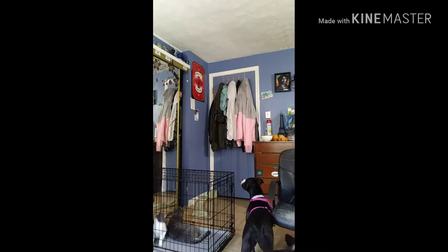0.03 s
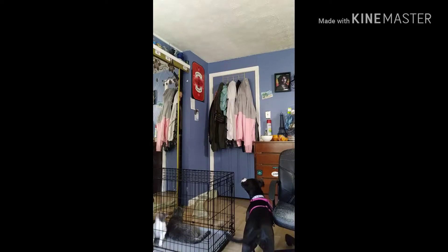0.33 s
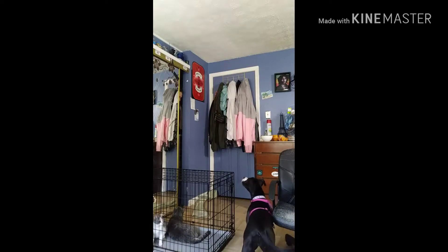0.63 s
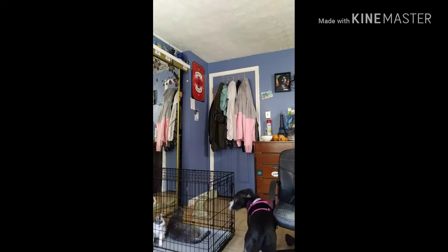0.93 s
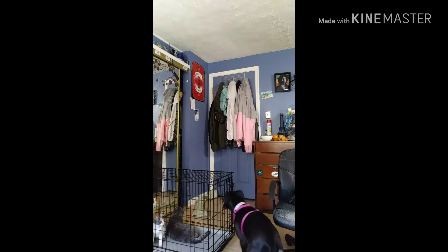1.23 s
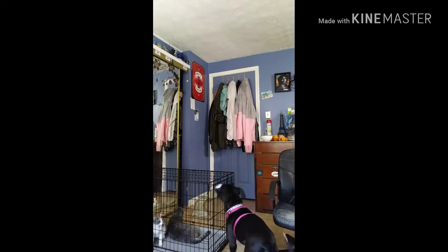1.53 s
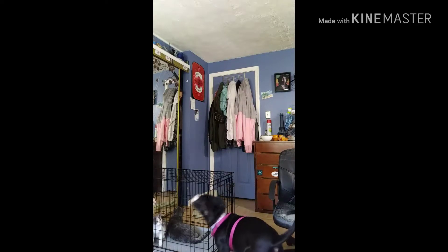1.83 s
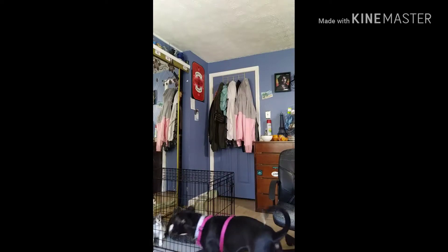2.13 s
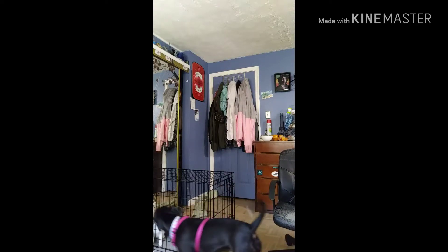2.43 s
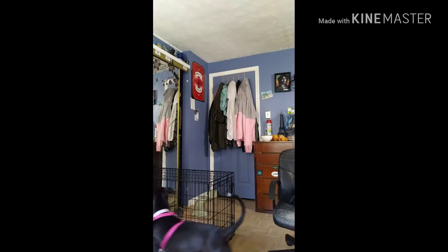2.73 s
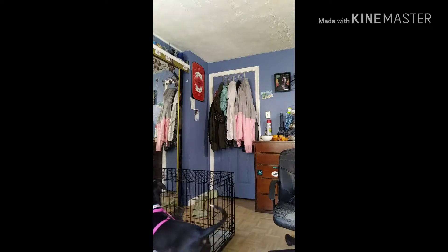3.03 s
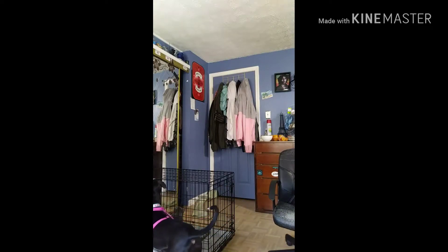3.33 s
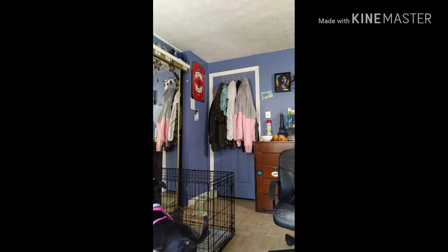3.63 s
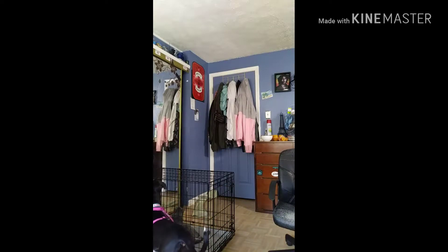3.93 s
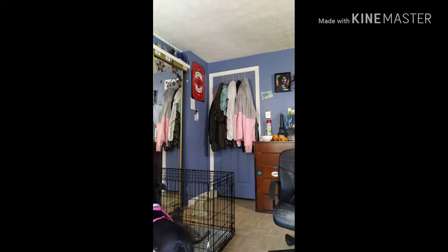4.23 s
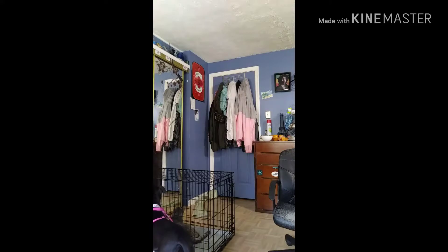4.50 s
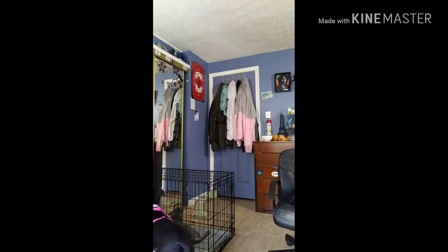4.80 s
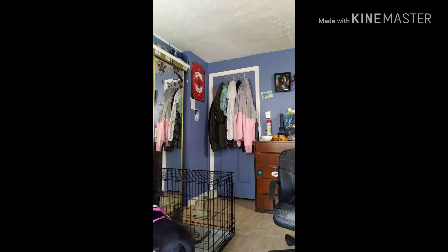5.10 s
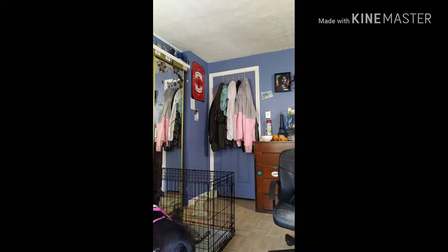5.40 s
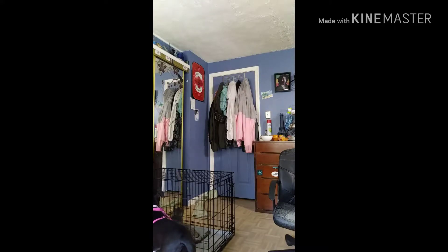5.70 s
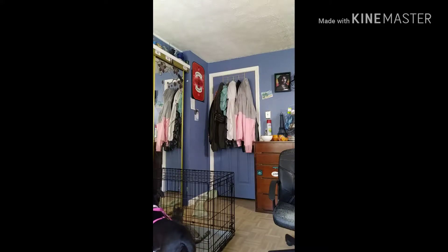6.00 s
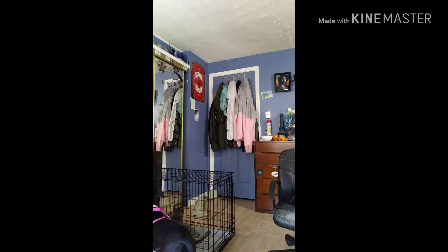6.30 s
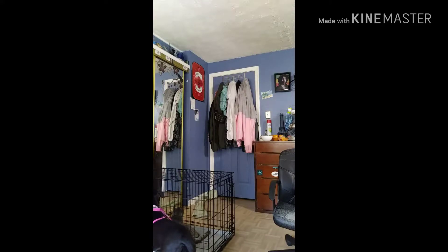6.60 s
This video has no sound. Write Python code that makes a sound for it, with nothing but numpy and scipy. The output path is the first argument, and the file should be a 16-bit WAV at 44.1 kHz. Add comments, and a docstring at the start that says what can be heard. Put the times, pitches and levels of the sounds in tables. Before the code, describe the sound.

Right at the start, a single short, raspy dog bark hits the microphone hard, with the brief echo of a small bedroom. About a second in come two bright snaps, then a quick swish as the dog slides past a wire crate. The rest is quiet: scattered clinks of harness and wire, a few soft paw steps on carpet, faint whistling whines and a low fan hum.

```python
"""A dog gives one loud, rough bark in a small bedroom, close enough to overload the microphone.
Its vocal folds break from a low grunt into a rasp, shaped by the throat, with hiss from the open jaws.
Two sharp snaps follow; the dog pads off over carpet, brushing along its wire crate, its harness ticking.
It whines in thin, faint whistles throughout, and a fan hums in the background."""
import sys
import numpy as np
from scipy import signal
from scipy.fft import rfft, irfft, next_fast_len
from scipy.io import wavfile
from scipy.ndimage import map_coordinates

SR = 44100
rng = np.random.default_rng(int(sys.argv[2]) if len(sys.argv) > 2 else 0)


def wav_out(sig):
    """Save sig, one row per channel (or a flat mono array), as 16-bit PCM at SR to the path in sys.argv[1]."""
    wavfile.write(sys.argv[1], SR, np.round(np.clip(np.atleast_2d(sig).T, -1, 1) * 32767).astype(np.int16))


N = 297675
TIME = np.arange(N) / SR


def amp(db):
    """Decibels to gain."""
    return 10 ** (np.asarray(db) / 20)


def unit(x):
    """Scale to rms 1."""
    return x / np.sqrt(np.mean(x ** 2) + 1e-20)


def along(points, hz):
    """Read a curve of (Hz, value) points on a log frequency axis."""
    freqs, values = np.transpose(points)
    return np.interp(np.log(hz + 1), np.log(freqs + 1), values)


def arch(start, length, crest, steep):
    """A smooth swell from 0 to 1 and back, peaking at the fraction crest of its length."""
    ramp = np.interp(TIME, start + length * np.array([0, crest, 1]), [0, 1, 0])
    return np.sin(np.pi / 2 * ramp) ** steep


def noise(samples=N):
    """White noise."""
    return rng.standard_normal(samples)


def wobble(rate):
    """A smooth random curve, rate knots a second."""
    return map_coordinates(noise(int(N * rate / SR) + 4), [TIME * rate])


def sine(hz):
    """A sine oscillator that follows a pitch curve."""
    return np.sin(2 * np.pi * np.cumsum(hz) / SR)


def filtered(x, response):
    """x through a complex frequency response."""
    size = next_fast_len(N + SR // 2)
    return irfft(rfft(x, size) * response(np.fft.rfftfreq(size, 1 / SR)), size)[:N]


def coloured(x, eq, size=4096):
    """x through a minimum-phase EQ of unit energy: only the curve's shape counts."""
    cepstrum = irfft(np.log(amp(along(eq, np.fft.rfftfreq(size, 1 / SR)))))
    cepstrum[1:size // 2] *= 2
    cepstrum[size // 2 + 1:] = 0
    kernel = irfft(np.exp(rfft(cepstrum)))
    return signal.fftconvolve(x, kernel / np.linalg.norm(kernel))[:N]


# The bedroom's short reverb. Each row: frequency in Hz, seconds to fall 60 dB.
ROOM_DECAY = [(150, 0.27), (500, .3), (2000, 0.24), (5000, 0.28), (12000, 0.23)]

def room(x, build_s):
    """The bedroom's diffuse tail builds up, then each frequency dies at its own speed."""
    hz, t, spectrum = signal.stft(noise(SR // 2), SR, nperseg=256)
    decay = amp(-60 * t / along(ROOM_DECAY, hz)[:, None])
    tail = signal.istft(spectrum * decay, SR, nperseg=256)[1]
    tail *= 1 - np.exp(-(np.arange(len(tail)) / SR / build_s) ** 2)
    return signal.fftconvolve(x, tail / np.linalg.norm(tail))[:N]


# The fan's hum. Each row: pitch in Hz, level in dB.
FAN_TONES = [(140.0, -70.5), (279.9, -64.5), (1007, -74.5)]
# Its dark rush of air. Each row: frequency in Hz, relative level in dB.
AIR_EQ = [(18, -43.5), (30, -22), (50, -7), (90, -11), (140, -5), (190, -14), (275, -3.5), (340, -12.5),
          (900, -20), (1200, -25.5), (3000, -31.5), (5300, -31.5), (7500, -43), (15400, -46.5)]

def fan(air_db=-61, drift_hz=1.2, waver_db=2):
    """A soft bed of moving air under slightly unsteady motor and blade tones."""
    hum = np.zeros(N)
    for hz, db in FAN_TONES:
        hum += amp(db + waver_db * wobble(6)) * unit(sine(hz + drift_hz * wobble(6.6)))
    return hum + amp(air_db) * unit(coloured(noise(), AIR_EQ))


def fidget(level_db=-64, spread_db=3, decay_s=.0054, count=45):
    """Faint scattered pings of harness and wire as the dog moves about."""
    pings = np.zeros(N + SR)
    t = np.arange(SR // 20) / SR
    for when, height, strength in rng.random((count, 3)):
        start = np.interp(when, [0, .75, 1], [.5, 4.3, 6.6])  # busier while it walks
        hz = 1300 * 2 ** (2.7 * height)
        ping = np.sin(2 * np.pi * hz * t) * np.exp(-t / decay_s) * (1 - np.exp(-t / .001))
        pings[round(start * SR):][:len(t)] += amp(level_db + spread_db * (2 * strength - .5)) * ping
    return pings[:N] + room(pings[:N], build_s=.004)


# Paws on carpet. Each row: start in seconds, relative peak level in dB.
PAW_STEPS = [(1.279, -50.5), (3.879, -47), (4.928, -52)]

def footfalls(attack_s=.023, gain_db=-8):
    """Soft steps thump the floor through the carpet."""
    envelope = np.zeros(N)
    for start, db in PAW_STEPS:
        age = np.maximum(TIME - start, 0) / attack_s
        envelope += amp(db) * age * np.exp(1 - age)
    thump_eq = [(25, -12.5), (50, 5), (130, -.5), (300, -23.5), (1000, -77.5)]  # Hz, dB
    return amp(gain_db) * envelope * unit(coloured(noise(), thump_eq))


# The whines. Each row: start in seconds, length in seconds, relative peak in dB, glide in Hz a second.
WHINE_SWELLS = [(.46, .27, -56.5, -700), (1.668, .3, -56, -200), (2.869, 0.31, -60.5, 304),
                (4.07, .36, -57, -150), (5.3, 0.36, -58.5, 0), (6.46, .4, -64.5, -2)]

def whines(centre_hz=5476, flutter=.0116, tremble_db=4, upper_ratio=1.28, direct_db=-6, room_db=-4):
    """Thin nasal whistles swell slowly and fade faster, with a weaker, shakier whistle above."""
    def whistle(hz, waver):
        return unit(sine(hz * (1 + waver * wobble(30) + flutter * wobble(300))))

    envelope, pitch = np.zeros(N), np.full(N, float(centre_hz))
    for start, length, db, glide in WHINE_SWELLS:
        swell = arch(start, length, crest=.7, steep=1.4)
        envelope += amp(db) * swell
        pitch += (swell > 0) * glide * (TIME - start - length / 2)
    envelope *= amp(tremble_db * wobble(35))
    lower = whistle(pitch, waver=.006)
    upper = amp(-20) * whistle(upper_ratio * pitch, waver=.025)
    sound = envelope * (lower + upper)
    return amp(direct_db) * sound + amp(room_db) * room(sound, build_s=.002)


# The bright, peaky swish along the crate. Each row: frequency in Hz, relative level in dB.
BRUSH_EQ = [(240, -53), (400, -31), (540, -9), (630, -3), (885, -43), (1440, -48), (1730, -2.5),
            (1930, -22.5), (2180, -4.5), (2350, -12.5), (2540, -9.5), (3780, -5.5), (5500, .5), (8500, -8),
            (11000, -19), (15400, -30)]

def brush(start_s=1.9497, length_s=.1675, gain_db=-31.5, grain_db=3, direct_db=-4, room_db=-2):
    """Coat and harness slide along the crate in one fine-grained stroke."""
    stroke = amp(gain_db) * arch(start_s, length_s, crest=.4, steep=1.4)
    friction = noise() * amp(grain_db * wobble(500))
    swish = stroke * unit(coloured(friction, BRUSH_EQ))
    return amp(direct_db) * swish + amp(room_db) * room(swish, build_s=.0028)


# Harness, claw and crate-wire ticks. Each row: start in seconds, relative level in dB,
# band centre in Hz, band width in octaves, decay in seconds.
CONTACTS = [(.797, -55, 5400, .09, .008), (1.122, -55.5, 8347, .3, .009), (1.244, -45.5, 8000, .28, 0.017),
            (1.264, -48.5, 5800, .5, .008), (1.682, -39.5, 3980, 0.45, 0.021),
            (1.83, -45.5, 5960, .24, .014), (1.942, -42.5, 6600, .12, 0.013), (2.346, -54, 5050, .07, .002),
            (2.74, -59, 3785, 0.68, 0.025), (3.371, -51, 5500, .25, .005), (3.382, -36, 5150, 0.27, .0016),
            (3.394, -55, 2490, .04, .005), (3.475, -57, 6430, 0.14, .001), (3.91, -49.5, 5600, 0.28, .005),
            (3.959, -51.5, 5400, 0.31, .005), (5.406, -47, 5500, .27, .008), (5.413, -50, 3750, .08, .005)]
# The ring of the small hardware. Each row: mode frequency in Hz, relative level in dB.
HARDWARE_MODES = [(1300, 14), (2490, 6.5), (3530, 2.5), (3980, -2), (4511, 2.5), (4764, -1.5), (5060, -3),
                  (5378, -2.5), (5900, -1), (6600, 1), (7200, -2.5), (9200, 1)]
# The tone shared by all ticks. Each row: frequency in Hz, relative level in dB.
TICK_EQ = [(1000, 1.5), (2500, 1.5), (3000, -4), (3600, 0), (4200, -3), (4600, 1), (5500, 3.5), (6250, -4),
           (7200, 1), (8000, -4.5), (9800, -8), (11500, -19), (15000, -26)]

def ticks(ring_s=.0067, ring_db=3, attack_share=.39, direct_db=17, room_db=17):
    """Each contact is a short scuff in its own band that sets the hardware's nearby modes ringing."""
    def band(hz, centre, octaves):
        return np.exp(-(np.log2((hz + 1) / centre) / (2 * octaves)) ** 2)

    taps = np.zeros(N + SR)
    t = np.arange(SR // 5) / SR
    freqs = np.fft.rfftfreq(len(t), 1 / SR)
    mode_hz, mode_db = np.transpose(HARDWARE_MODES)
    for start, db, centre, octaves, decay_s in CONTACTS:
        scuff = irfft(band(freqs, centre, octaves) * rfft(noise(len(t)))) * np.exp(-t / decay_s)
        strengths = band(mode_hz, centre, octaves) * amp(mode_db + rng.normal(0, 2.1, len(mode_hz)))
        strengths *= rng.choice([-1, 1], len(mode_hz))
        clink = strengths @ np.sin(2 * np.pi * np.outer(mode_hz, t)) * np.exp(-t / ring_s)
        attack = 1 - np.exp(-t / (attack_share * decay_s))
        tick = attack * (unit(scuff) + amp(ring_db) * unit(clink))
        taps[round(start * SR):][:len(t)] += amp(db) * tick / np.linalg.norm(tick)
    sound = coloured(taps[:N], TICK_EQ)
    return amp(direct_db) * sound + amp(room_db) * room(sound, build_s=.0034)


# The two snaps. Each row: start in seconds, relative level in dB.
SNAP_HITS = [(0.9571, -25), (1.3103, -16.5)]
# A shielded direct path, then strong slaps off walls and ceiling. Each row: delay in seconds, gain in dB.
SNAP_PATHS = [(0, -1), (.0098, 4.5), (0.0134, 6), (0.0226, 5.5)]
# The snaps' hard, bright edge. Each row: frequency in Hz, relative level in dB.
SNAP_EQ = [(410, -50), (700, -31), (774, -50), (866, -40), (1220, -38), (1420, -11.5), (1750, -14.5),
           (2200, -6), (3530, -6), (4050, .5), (4360, -2.5), (4820, .5), (5400, -3), (5900, -10),
           (6600, -10), (7200, -15), (10400, -33), (14000, -64.5)]

def snaps(decay_s=.0042, direct_db=10, room_db=8):
    """Each snap is a sharp crack that arrives along several paths, a burst of noise for each."""
    cracks = np.zeros(N)
    t = np.arange(SR // 50) / SR
    for start, db in SNAP_HITS:
        for delay, path_db in SNAP_PATHS:
            crack = np.exp(-t / decay_s) * noise(len(t))
            crack /= np.linalg.norm(crack)
            cracks[round((start + delay) * SR):][:len(t)] += amp(db + path_db) * crack
    sound = coloured(cracks, SNAP_EQ)
    return amp(direct_db) * sound + amp(room_db) * room(sound, build_s=.0024)


# Narrow resonances under the bark. Each row: frequency in Hz, bandwidth in Hz, gain in dB.
WIRE_MODES = [(1375, 22, -4), (1460, 22, -5), (1750, 20, 2), (1980, 24, -3), (2620, 60, -3), (4472, 32, 8),
              (6310, 40, 5)]

def wire_ring(x):
    """A sympathetic ring, likely from the crate's wires."""
    return filtered(x, lambda hz: sum(
        amp(db) * 1j * hz * width / (centre ** 2 - hz ** 2 + 1j * hz * width)
        for centre, width, db in WIRE_MODES))


def clean_folds(pitch, octave_db):
    """Cleanly vibrating vocal folds: a slightly unsteady fundamental and its octave."""
    hz = pitch * (1 + .012 * wobble(200))
    return unit(sine(hz) + amp(octave_db) * sine(2 * hz))


# The body of the bark, shaped by throat and jaws. Each row: frequency in Hz, relative level in dB.
THROAT_EQ = [(20, -50), (55, -24), (130, -17), (230, -13), (340, -10), (410, -4), (470, -3.5), (560, -3),
             (610, -9), (700, -1), (800, 0.5), (950, -3), (1080, -4.5), (1400, -0.5), (1900, -4.5),
             (2150, -13.5), (2620, -9), (2950, -26), (14000, -68)]
# The mouth's hiss on top. Each row: frequency in Hz, relative level in dB.
MOUTH_EQ = [(2500, -29), (3100, -12.5), (3700, 3), (4100, -5), (4600, -3), (5300, -2.5), (6050, -9),
            (6800, -5.5), (8800, -15), (11000, -25), (15000, -32)]

def rough_folds(pitch, jaws_open, jitter=.11, breath_share=.8, rasp_db=-7.5, hiss_db=-14, shut_db=-11):
    """The folds close irregularly and unevenly, each cycle letting a puff of turbulent air through."""
    cycles = np.cumsum(pitch * (1 + jitter * wobble(400))) / SR
    closures = np.diff(np.floor(cycles), prepend=0) * amp(3 * wobble(400))
    airflow = 1 + .72 * np.cos(2 * np.pi * cycles)
    buzz = np.sqrt(1 - breath_share) * unit(closures - closures.mean())
    breath = np.sqrt(breath_share) * unit(airflow * noise())
    rasp = unit(coloured(buzz + breath, THROAT_EQ))
    hiss = unit(coloured(airflow * noise(), MOUTH_EQ))
    return amp(rasp_db) * rasp + amp(hiss_db + shut_db * (1 - jaws_open)) * hiss


# The note inside the bark. Each row: time in seconds, pitch in Hz, clear tone's relative level in dB.
BARK_NOTE = [(0.22, 460.8, -15), (0.244, 459.6, -9), (0.27, 460.5, -16), (0.288, 488.8, -15),
             (0.312, 484, -17)]

def bark(peak_s=.21445, hold_s=.094, open_s=.057, close_s=.09, clear_lag_s=.003, clear_fade_s=.008):
    """A low grunt leaps an octave as the mouth opens, and the folds rasp around a clear tone."""
    age = TIME - peak_s
    times, note_hz, note_db = np.transpose(BARK_NOTE)
    pitch, clear_db = np.interp(TIME, times, note_hz), np.interp(TIME, times, note_db)
    lead_in = amp(-22.5) * arch(start=.179, length=.044, crest=.68, steep=1.8)
    grunt = lead_in * clean_folds(pitch=220, octave_db=-12)
    clear_gate = np.clip(np.minimum(age - clear_lag_s, hold_s + clear_fade_s - age) / clear_fade_s, 0, 1)
    voice = grunt + clear_gate * amp(clear_db + 2) * clean_folds(pitch, octave_db=-16)
    # The effort shoots up, sags while held, then is let go; slopes are in dB a second.
    rise_db = 2600 * np.minimum(age, 0)
    sag_db = -65.5 * np.maximum(age, 0)
    release_db = -570.5 * np.maximum(age - hold_s, 0)
    jaws_open = np.interp(age, [0, open_s, open_s + close_s], [0, 1, 0])
    cry = amp(rise_db + sag_db + release_db) * rough_folds(pitch, jaws_open)
    cry *= amp(wobble(120))  # the level flickers by about 1 dB
    cry = amp(-3) * (cry + amp(-1) * wire_ring(cry))
    return voice + cry + room(cry + amp(-17) * voice, build_s=.0047)


def scene():
    """Everything in the bedroom, mixed to one microphone."""
    return (bark() + snaps() + ticks() + fidget() + brush() + whines() + footfalls() + fan())[None]


def record(dry, ceiling=.92, hardness=5, top_hz=15500):
    """The overloaded microphone rounds off the bark's peaks; everything above top_hz is cut."""
    clipped = dry[0] / (1 + np.abs(dry[0] / ceiling) ** hardness) ** (1 / hardness)
    return filtered(clipped, lambda hz: hz < top_hz)[None]


dry = scene()
out = record(dry)
wav_out(out)
```